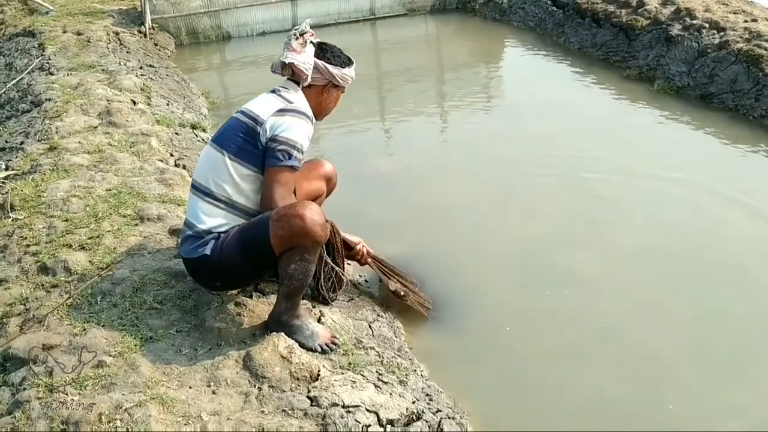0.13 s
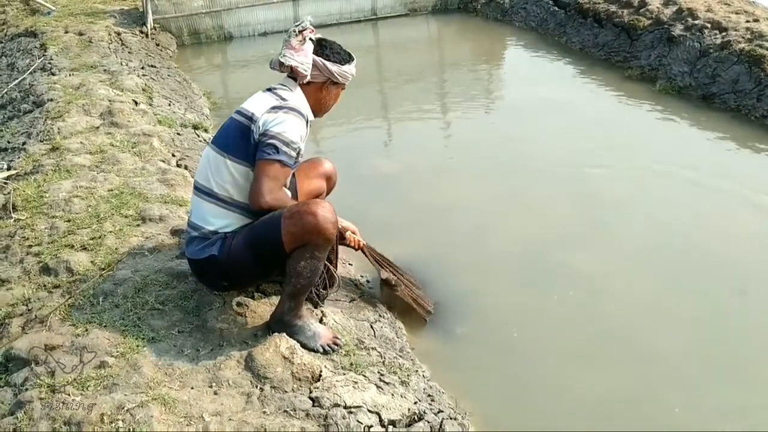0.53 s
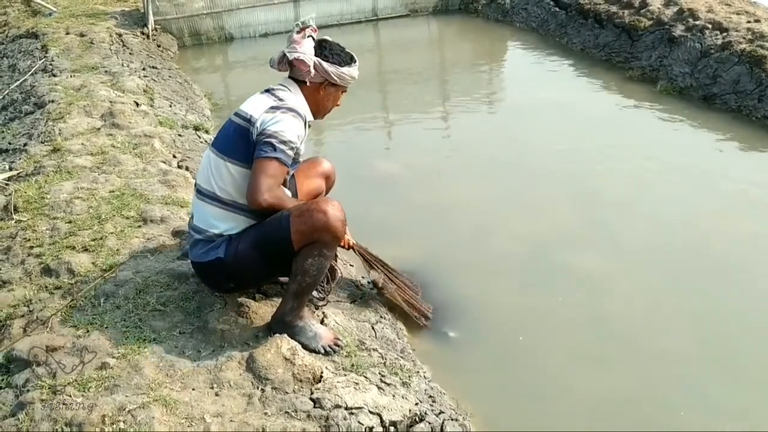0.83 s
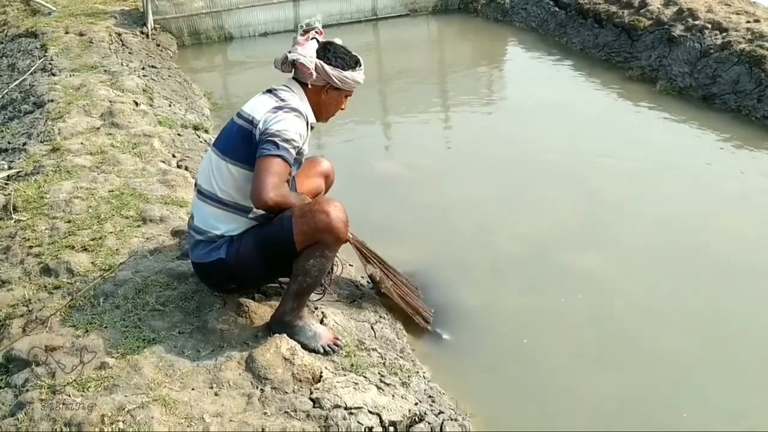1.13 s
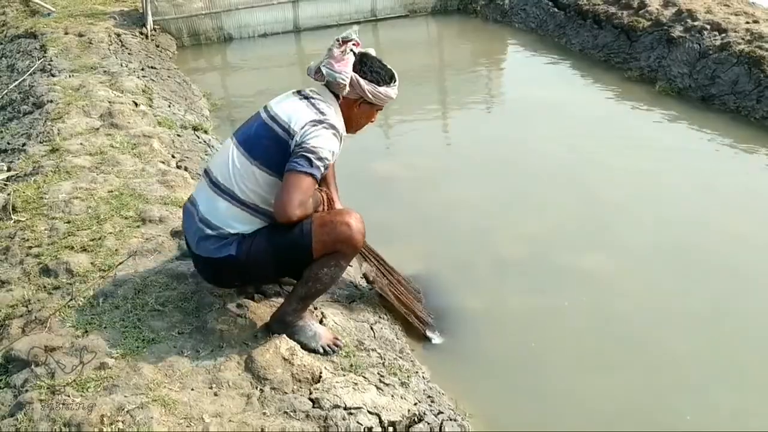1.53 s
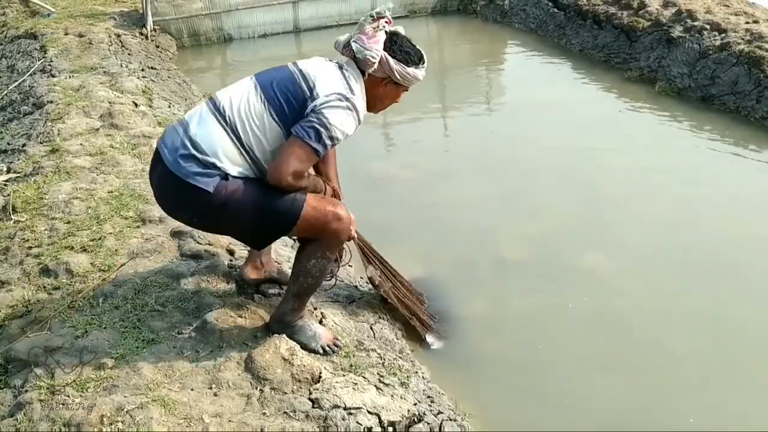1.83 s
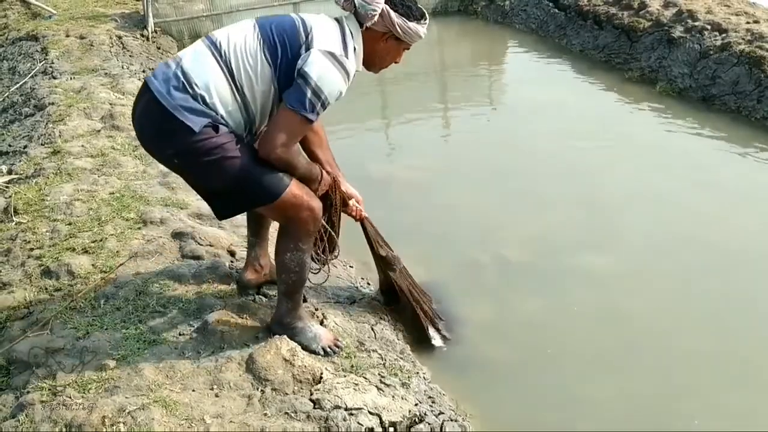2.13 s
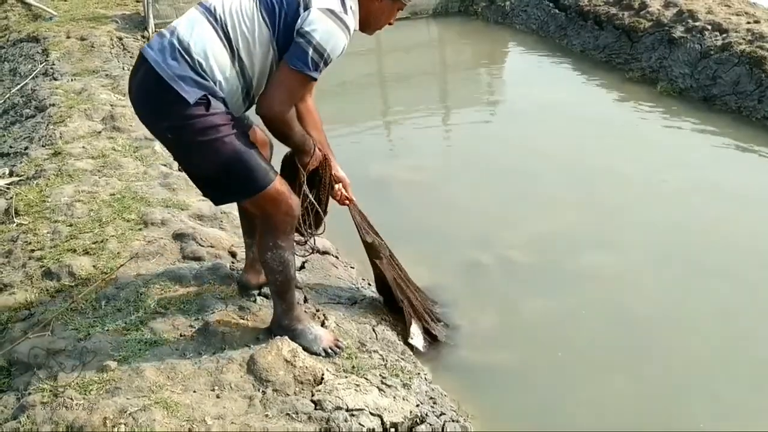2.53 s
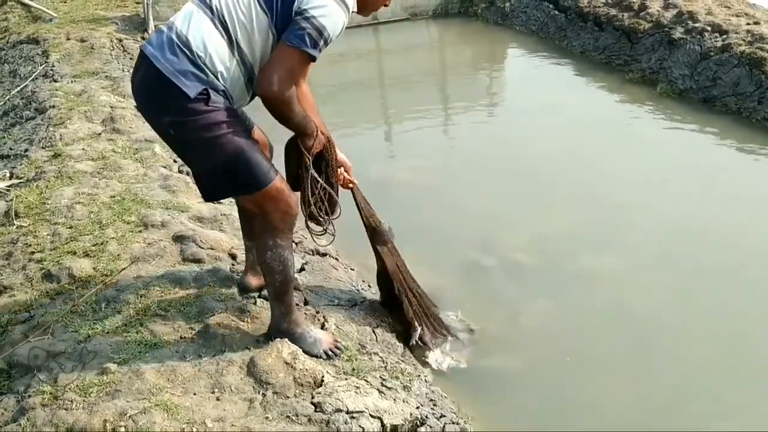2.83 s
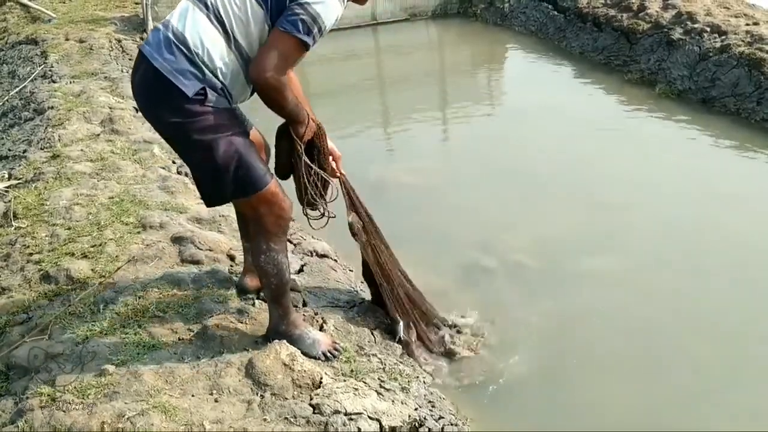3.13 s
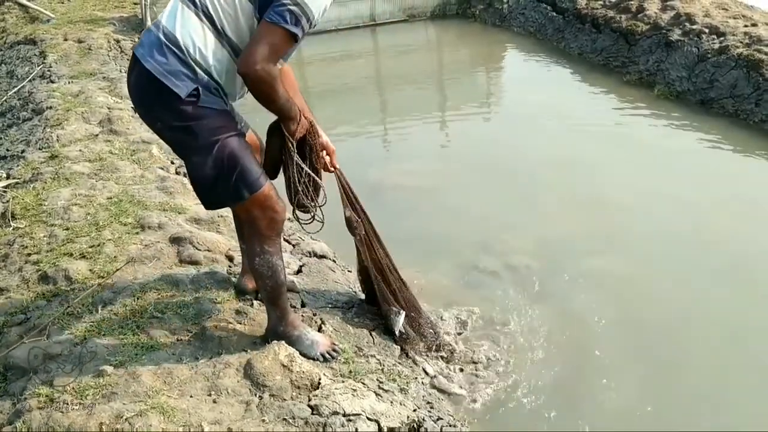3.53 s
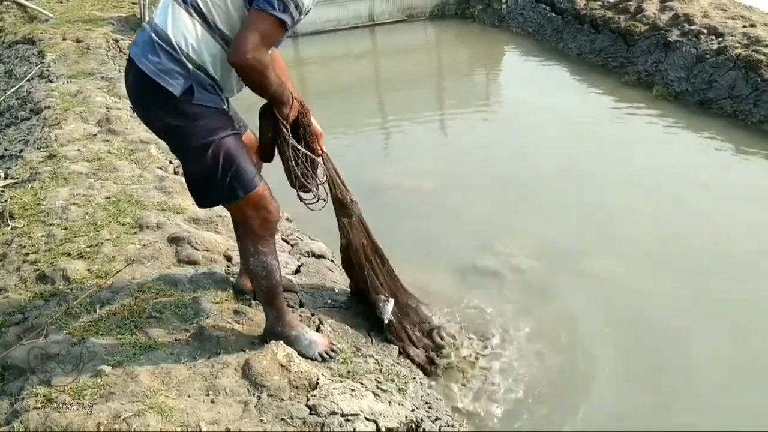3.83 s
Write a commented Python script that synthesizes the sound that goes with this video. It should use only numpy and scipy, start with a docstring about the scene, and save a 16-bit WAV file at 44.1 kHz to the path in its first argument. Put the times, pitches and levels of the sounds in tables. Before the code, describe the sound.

Uneven gusts buffet an outdoor phone microphone, with slight crackly rasp on the strongest surges; after a tiny bright water spit, a net of fish splashes at the pond edge, slapping until the end.

```python
"""Gusty wind buffets the two microphone ports of a phone at the edge of a muddy pond: noise shaped into rumble,
flutter and sudden buffets. A limiter pulls down the exposed port's strongest surges, with an added buzz and rasp.
A cast net comes up to the surface and fish thrash in it: patchy noise and short sine grains make the spray,
gliding decaying sines make the slaps, and a brief bright hiss is water spitting off the mesh. Faint open air
lies beneath as steady noise."""
import sys
import numpy as np
from scipy import signal
from scipy.fft import rfft, irfft
from scipy.io import wavfile
from scipy.ndimage import uniform_filter1d

SR = 44100
rng = np.random.default_rng(int(sys.argv[2]) if len(sys.argv) > 2 else 0)


def file_out(sig):
    """Save sig as 16-bit WAV at sys.argv[1]."""
    # one column per channel
    cols = np.atleast_2d(sig).T
    # limit, then scale
    lim = np.clip(cols, -1, 1)
    pcm = np.round(lim * 32767).astype(np.int16)
    wavfile.write(sys.argv[1], SR, pcm)


def makeup_ratio(level_db):
    """Linear amplitude ratio for a level in decibels (20 dB per factor of ten)."""
    decades = np.asarray(level_db, float) / 20
    return 10 ** decades


N = 176400  # samples

# spectrum of torn water: f/Hz, relative density level/dB
TORN_WATER = [(650, -9.5), (1100, -6), (2490, -6.5), (2790, -9.5), (3490, -8.5), (6680, -13), (9140, -15.5),
              (14800, -23), (16000, -41)]


def exposed_wind():
    """Turbulent pressure: eddies rumble, and flutter grows faster than rumble as the gust strengthens."""
    # gusts on the exposed port: t/s, relative rumble level/dB
    gust_rows = [(0.0, -42.5), (0.06, -44.5), (0.08, -41), (0.14, -63), (0.19, -69.5), (0.22, -36.5),
                 (0.339, -59), (0.409, -36.5), (0.449, -52), (0.479, -40), (0.629, -76.5), (0.668, -55.5),
                 (0.718, -80), (0.808, -74), (0.828, -36.5), (0.918, -31.5), (1.018, -38), (1.038, -37),
                 (1.088, -41.5), (1.18, -31.5), (1.3, -35.5), (1.365, -33.5), (1.436, -44.5),
                 (1.476, -68.5), (1.51, -93), (1.526, -47.5), (1.554, -77), (1.585, -50), (1.63, -59.5),
                 (1.67, -62), (1.716, -45), (1.746, -31.5), (1.866, -41.5), (1.916, -33.5), (1.946, -39),
                 (2.035, -31.5), (2.095, -37.5), (2.185, -35.5), (2.27, -31), (2.454, -34), (2.515, -41.5),
                 (2.548, -71), (2.566, -49), (2.614, -44), (2.794, -28.5), (2.993, -33.5), (3.063, -40.5),
                 (3.103, -96), (3.173, -34.5), (3.243, -40), (3.402, -63.5), (3.442, -35.5), (3.492, -39),
                 (3.552, -99), (3.592, -31), (3.986, -35)]
    # sudden buffets: t/s, relative peak level/dB
    buffet_rows = [(0.083, -46.5), (0.212, -54), (0.400, -40.5), (0.826, -55), (0.872, -38.5),
                   (0.983, -38.5), (1.155, -47), (1.336, -47.5), (1.625, -61), (1.72, -56.5), (1.79, -33.5),
                   (1.912, -48), (2.11, -44.5), (2.149, -31.5), (2.252, -42), (2.3, -29.5), (2.398, -39.5),
                   (2.446, -35.5), (2.589, -49), (2.613, -39), (2.678, -33.5), (2.73, -29.5),
                   (3.205, -28.5), (3.576, -51)]
    # rumble spectrum: f/Hz, relative density level/dB
    rumble_spectrum = [(20, -21.5), (45, -12), (65, -3.5), (105, 5), (150, 3), (200, 0), (290, -10),
                       (420, -73.5)]
    # flutter spectrum: f/Hz, relative density level/dB
    flutter_spectrum = [(110, -13.5), (200, 0), (300, 3), (430, -3), (600, -10), (1200, -31), (1800, -46.5),
                        (3500, -63.5), (7000, -95)]
    strong_db, flutter_db, growth = -34.5, -5, 2.3  # growth: dB of flutter per dB of gust
    rise_s, buffet_t60_s = 0.0012, 0.1
    knock_db, knock_t60_s, tilt_db_per_octave = -4.5, 0.049, 2.5

    a, b, c = rng.standard_normal((3, N))
    gust_db = curve(gust_rows)
    rumble = colour(a * lumps(depth_db=2.5, lump_s=0.014), rumble_spectrum) * makeup_ratio(gust_db)

    # growth stops 4 dB above a strong gust
    steady_db = strong_db + flutter_db + growth * np.minimum(gust_db - strong_db, 4.0)
    stirred = makeup_ratio(steady_db) * lumps(depth_db=2.5, lump_s=0.017)
    stirred = stirred + makeup_ratio(3.0) * strikes(buffet_rows, rise_s, buffet_t60_s)
    flutter = colour(b * lumps(depth_db=3.0, lump_s=0.004), flutter_spectrum) * stirred

    # each buffet opens with a short, brighter knock
    bright = [(hz, db + tilt_db_per_octave * np.log2(hz)) for hz, db in flutter_spectrum]
    knocks = makeup_ratio(knock_db) * colour(c, bright) * strikes(buffet_rows, rise_s / 2, knock_t60_s)
    return makeup_ratio(5.0) * (rumble + flutter + knocks)


def sheltered_wind():
    """Turbulent pressure in the lee: lumpy low-frequency noise follows its own gust curve."""
    # wind on the sheltered port: t/s, relative level/dB
    lee_rows = [(0.0, -61.5), (0.14, -56), (0.19, -85), (0.3, -55.5), (0.45, -62), (0.68, -55.5),
                (0.8, -49.5), (1.03, -53), (1.14, -38.5), (1.25, -46.5), (1.36, -40), (1.49, -76),
                (1.54, -53), (1.84, -37.5), (1.93, -85), (2.09, -56), (2.26, -39), (2.43, -83), (2.79, -44),
                (3.28, -65)]
    # rumble spectrum: f/Hz, relative density level/dB
    lee_spectrum = [(20, -24), (45, -6.5), (85, 16), (150, 4), (215, 0.5), (300, -16.5), (430, -9),
                    (600, -30), (1200, -90)]
    eddies = rng.standard_normal(N) * lumps(depth_db=5.0, lump_s=0.029)
    return makeup_ratio(2.5) * colour(eddies, lee_spectrum) * makeup_ratio(curve(lee_rows))


def limiter(x):
    """Dynamic compression: smoothed gain reduction and a soft knee; a buzz and rasp mark each rise over the ceiling."""
    # partials of the buzz: multiple of buzz_hz, relative level/dB
    buzz_partials = [(.5, 0.5), (1, 2.5), (2, -8.5)]
    ceiling_db, ratio, knee_db = -28.5, 8.0, -25.0
    look_ahead_s, grab_s, recover_db_per_s = 0.0007, 0.0036, 282
    buzz_hz, chatter_db = 5970, -78
    wander_step = 150  # samples

    t = np.arange(N) / SR
    over_db = np.maximum(20 * np.log10(abs(x) + 1e-9) - ceiling_db, 0) * (1 - 1 / ratio)
    # instant rise, steady recovery
    recovery_db = recover_db_per_s * t
    held_db = np.maximum.accumulate(over_db + recovery_db) - recovery_db
    # two equal lags in cascade, each of half the grab time
    r = np.exp(-2 / (grab_s * SR))
    smooth_db = signal.lfilter([(1 - r) ** 2], np.convolve([1, -r], [1, -r]), held_db)
    gain = np.roll(makeup_ratio(-smooth_db), -round(look_ahead_s * SR))

    onset = np.gradient(uniform_filter1d(np.tanh(over_db / 8.0), size=12))
    grab = np.maximum(onset, 0) ** 1.5
    buzz = np.zeros(N)
    for multiple, db in buzz_partials:
        # one random series moves both level and phase
        wander = rng.standard_normal(N // wander_step + 2)
        drift_db = 4.6 * np.interp(t, np.arange(len(wander)) * wander_step / SR, wander)
        phase = np.repeat(wander.cumsum(), wander_step)[:N]
        buzz += makeup_ratio(db + drift_db) * np.sin(2 * np.pi * multiple * buzz_hz * t + phase)
    rasp = colour(rng.standard_normal(N), [(800, -19), (1500, -14.0), (12500, -22.0), (15000, -18)])
    chatter = grab * (evened(buzz) + makeup_ratio(-1.5) * rasp)

    limited = makeup_ratio(knee_db) * np.tanh(x * gain / makeup_ratio(knee_db))
    return limited + makeup_ratio(chatter_db) * evened(chatter)


def spray():
    """Superposed random events: hiss of torn water plus many small droplets and bubbles follow the thrashing."""
    # the fish's thrashing: t/s, relative spray level/dB
    thrash_rows = [(2.6, -112), (2.79, -71), (2.83, -73.5), (2.88, -72), (2.97, -78.5), (3.08, -76.5),
                   (3.14, -65), (3.28, -61.5), (3.4, -73.5), (3.48, -60.5), (3.7, -65.5), (3.86, -67.5),
                   (3.89, -57.5), (4, -66.5)]
    drops_per_s, drops_db, drop_spread_db = 450, -1.0, 5  # rate per strand, level relative to the hiss
    sizes = 24

    drops = np.zeros((2, N))
    for hz in np.geomspace(1200, 9000, num=sizes):
        t = np.arange(0, 10.2 / hz, 1 / SR)
        envelope = np.sin(np.pi * t / t[-1]) ** 2 * np.exp(-t * hz / 5.5)
        grain = envelope * np.sin(2 * np.pi * hz * t * (1 + 0.053 * t / t[-1]))  # rising pitch
        strength_db = drop_spread_db * np.minimum(rng.exponential(size=(2, N)), 4)
        hits = (rng.random((2, N)) < drops_per_s / sizes / SR) * makeup_ratio(strength_db)
        drops += signal.oaconvolve(hits, grain[None] * np.sqrt(hz), axes=1)[:, :N]
    drops = colour(drops, [(1200, -3.5), (2500, 2), (4000, -7.5), (9000, -7.5)])

    hiss = colour(patchy(depth_db=1.5) * lumps(depth_db=1.0, lump_s=0.013), TORN_WATER)
    a, b = hiss + makeup_ratio(drops_db) * drops
    return makeup_ratio(5.0) * pair(a, b) * makeup_ratio(curve(thrash_rows))


def slaps():
    """Cavity resonance: each tail slap rings a small air pocket that rises in pitch, inside a burst of spray."""
    # tail slaps on the water: t/s, relative peak level/dB, starting cavity f/Hz
    slap_rows = [(2.881, -50, 1500), (3.100, -56, 2550), (3.125, -50, 2370), (3.148, -47, 1840),
                 (3.2106, -51, 2340), (3.2335, -48.5, 2240), (3.4352, -44.5, 1087), (3.48, -51.5, 2430),
                 (3.529, -43, 2480), (3.615, -62, 2330), (3.676, -51, 2140), (3.817, -49, 2410),
                 (3.872, -51, 1860), (3.898, -53, 2360)]
    rise_s, t60_s, burst_db = 0.0004, 0.027, -7
    glide = 0.035  # pitch rises by twice this fraction over t60_s

    t, rings = np.arange(3000) / SR, np.zeros(N + 3000)
    shape = (1 - np.exp(-t / rise_s)) * makeup_ratio(-60 * t / t60_s)
    shape = shape / shape.max()
    for s, db, hz in slap_rows:
        i = round(s * SR)
        tone = np.sin(2 * np.pi * hz * t * (1 + glide * t / t60_s))
        rings[i:i + len(t)] += makeup_ratio(db) * shape * tone

    burst = makeup_ratio(burst_db) * strikes(slap_rows, rise_s=0.0006, t60_s=0.071)
    a, b = colour(patchy(depth_db=2.5), TORN_WATER) * burst
    return pair(a, b) + rings[:N] * makeup_ratio([[-1.5], [1.5]])


def spits():
    """Gated broadband noise: water spits off the mesh in a brief bright hiss, nearer the right."""
    # spits of water: start t/s, length t/s, relative level/dB
    spit_rows = [(2.581, 0.015, -60.5)]
    # spit spectrum: f/Hz, relative density level/dB
    spit_spectrum = [(1760, -65), (3000, -11), (7100, 10), (11700, 0), (14300, -6), (16000, -33)]
    noise = colour(rng.standard_normal((2, N)), spit_spectrum)
    a, b = noise * spans(spit_rows, edge_s=0.014) * lumps(depth_db=7.5, lump_s=0.0019)
    return pair(a, b)


def air():
    """Stationary ambient noise: a faint open-air floor, partly correlated between the sides."""
    # open-air spectrum: f/Hz, relative density level/dB
    air_spectrum = [(270, -11.5), (350, -7), (480, -3), (700, -13), (1500, -24.5), (3000, -26.5),
                    (9700, -32), (16000, -41)]
    air_db = -79.5
    a, b = colour(rng.standard_normal((2, N)), air_spectrum)
    return makeup_ratio(air_db) * np.array([makeup_ratio(0.5) * (0.41 * a + 0.71 * b), a])


def pair(a, b):
    """Interaural-style coherence: mixes two independent strands into left and right by frequency."""
    # likeness of the sides: f/Hz, left-right correlation [0 to 1]
    likeness = [(1000, 1), (2500, 0.57), (5000, 0.1), (9000, 0.64)]
    # left relative to right: f/Hz, level/dB
    left_balance = [(1300, -7.5), (2400, -3.5), (4400, -7.5), (8000, -4), (15000, 2.5)]
    hz = np.fft.rfftfreq(N, 1 / SR)
    same = np.clip(read(likeness, hz), 0, 1)
    left = same * rfft(a) + np.sqrt(1 - same ** 2) * rfft(b)
    return np.array([irfft(left * makeup_ratio(read(left_balance, hz)), N), a])


def patchy(depth_db):
    """Short-time spectral modulation: two strands of noise drift in level in patches of time and pitch."""
    z = signal.stft(rng.standard_normal((2, N)), nperseg=256, noverlap=192)[2]
    field = rng.standard_normal(z.shape[1:])
    small = evened(uniform_filter1d(uniform_filter1d(field, size=6, axis=0), size=6, axis=1))
    large = evened(uniform_filter1d(uniform_filter1d(field[::-1], size=30, axis=0), size=16, axis=1))
    z = z * makeup_ratio(depth_db * (small + 1.33 * large))
    return evened(signal.istft(z, nperseg=256, noverlap=192)[1][:, :N])


def strikes(rows, rise_s, t60_s):
    """Impulse response: each row excites a quick rise and an exponential decay of 60 dB per t60_s."""
    t, hits = np.arange(8000) / SR, np.zeros(N)
    for row in rows:
        hits[round(row[0] * SR)] = makeup_ratio(row[1])
    shape = (1 - np.exp(-t / rise_s)) * makeup_ratio(-60 * t / t60_s)
    return signal.oaconvolve(hits, shape / shape.max())[:N]


def spans(rows, edge_s):
    """Linear gating: gain opens to each row's level for its length."""
    t, gain = np.arange(N) / SR, np.zeros(N)
    for s, length, db in rows:
        inside_s = np.minimum(t - s, s + length - t)
        gain += makeup_ratio(db) * np.clip(inside_s / edge_s + 0.5, 0, 1)
    return gain


def lumps(depth_db, lump_s):
    """Random amplitude modulation: level lumps of about the given length."""
    size = max(round(lump_s * SR), 2)
    smooth = uniform_filter1d(uniform_filter1d(rng.standard_normal(N), size), size)
    return evened(makeup_ratio(depth_db * evened(smooth)))


def colour(x, spectrum):
    """Linear filtering: weights the spectrum of x by the table, then scales to rms 1."""
    n = x.shape[-1]
    weight = makeup_ratio(read(spectrum, np.fft.rfftfreq(n, 1 / SR)))
    return evened(irfft(rfft(x) * weight, n))


def curve(rows):
    """Level envelope: a time table of dB interpolated at every sample."""
    s, db = np.transpose(rows)
    return np.interp(np.arange(N) / SR, s, db)


def read(points, hz):
    """Logarithmic pitch scale: interpolates a table on a log-frequency axis."""
    f, value = np.transpose(points)
    return np.interp(np.log(hz + 1), np.log(f + 1), value)


def evened(x):
    """Mean-square normalisation: scales to rms 1."""
    return x / np.sqrt(np.mean(x ** 2) + 1e-20)


def scene():
    """Superposition: the exposed port feeds both sides, the sheltered port mostly the right."""
    crossfeed_db, lee_leak_db = -3, -14
    exposed = limiter(exposed_wind())
    lee = sheltered_wind()
    ports = np.array([exposed + makeup_ratio(lee_leak_db) * lee, makeup_ratio(crossfeed_db) * exposed + lee])
    return ports + spray() + slaps() + spits() + air()


def band_limit(x):
    """A steep low-pass at the top of the band."""
    return signal.sosfilt(signal.butter(12, 16230, fs=SR, output="sos"), x)


def record(dry):
    """Signal chain: the superposed sources form the finished mix at unity gain."""
    return band_limit(dry)


dry = scene()
out = record(dry)
file_out(out)
```